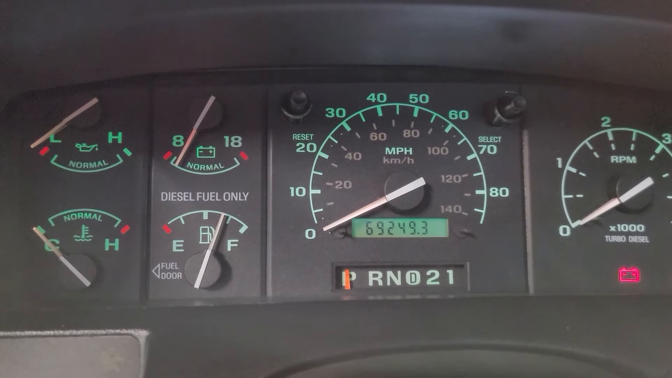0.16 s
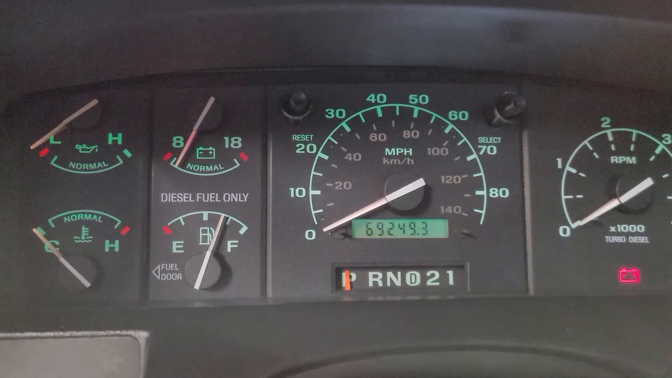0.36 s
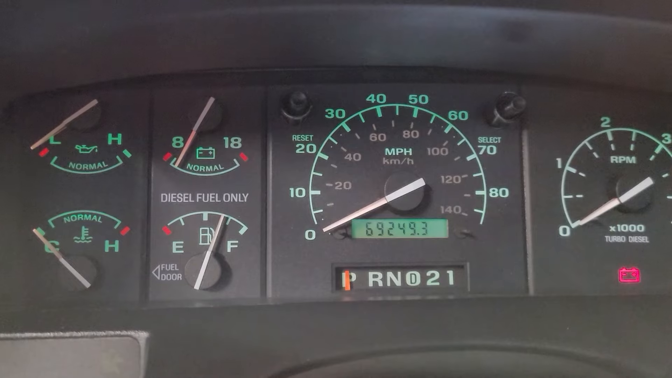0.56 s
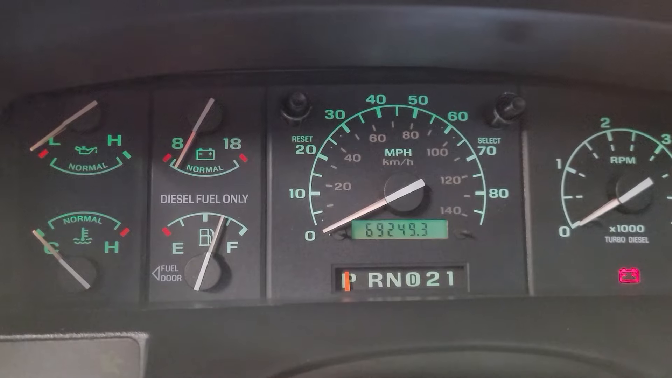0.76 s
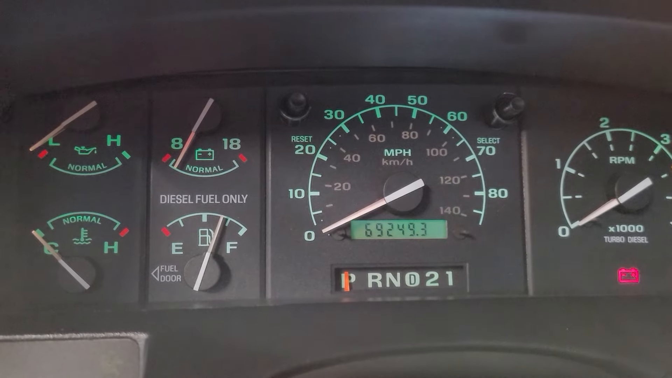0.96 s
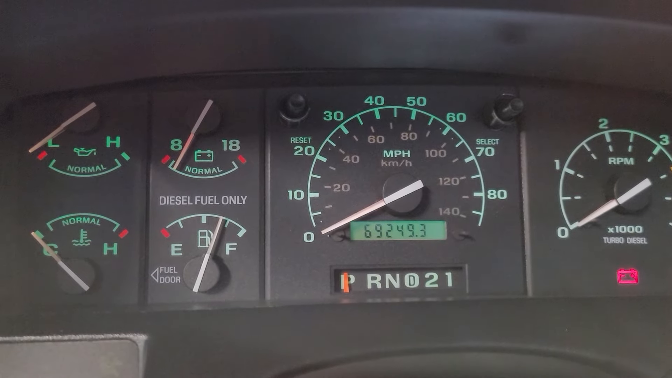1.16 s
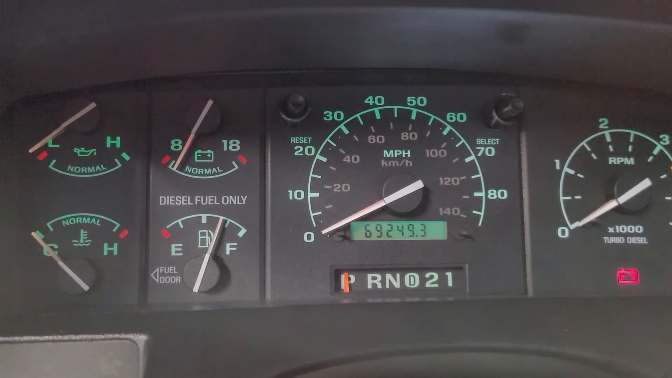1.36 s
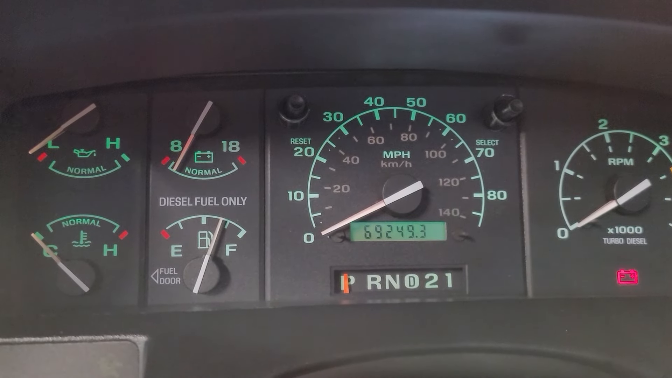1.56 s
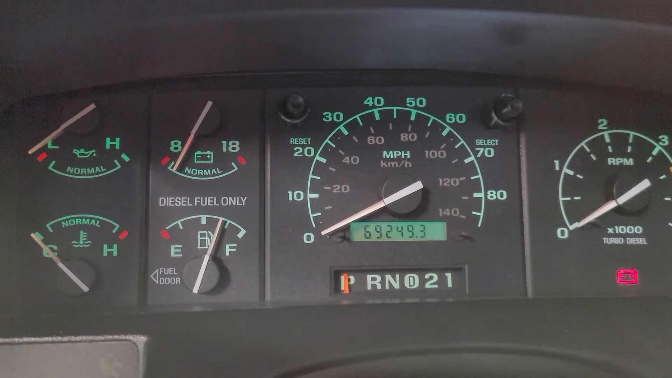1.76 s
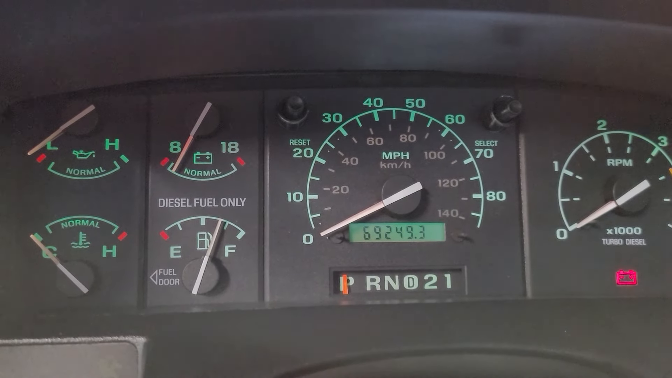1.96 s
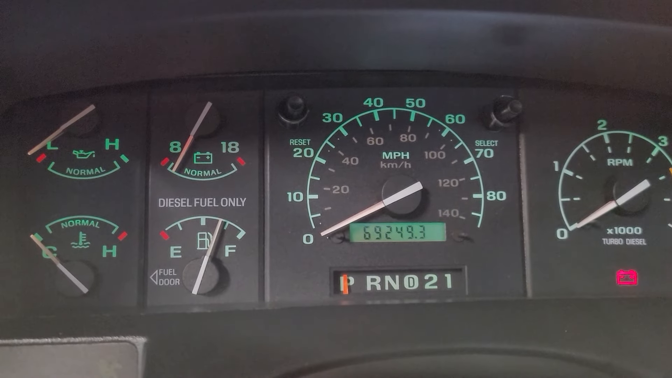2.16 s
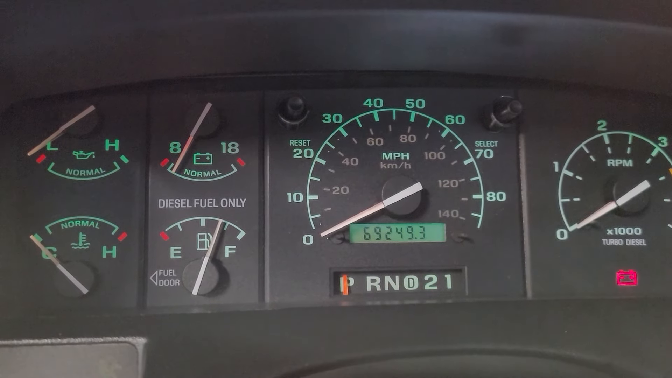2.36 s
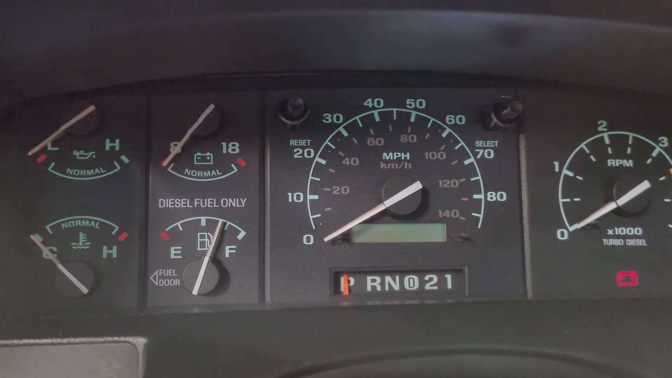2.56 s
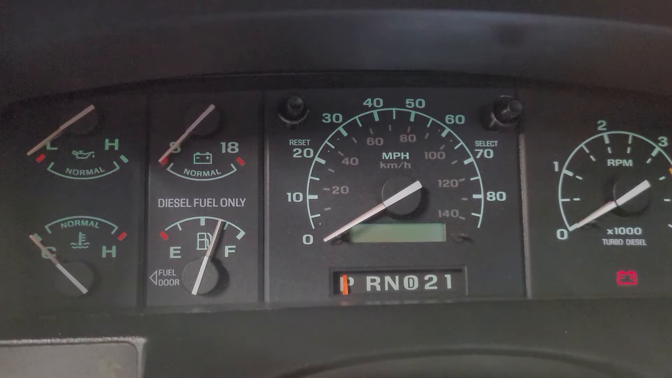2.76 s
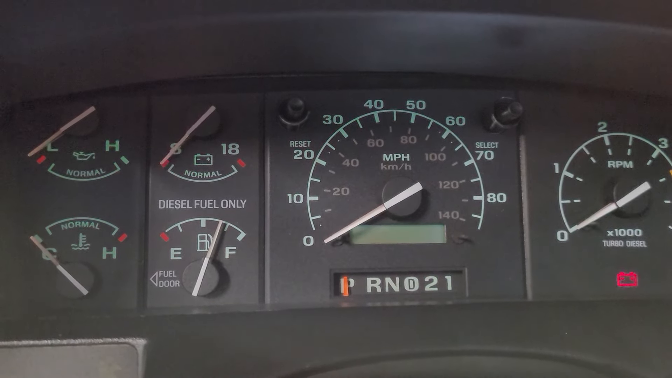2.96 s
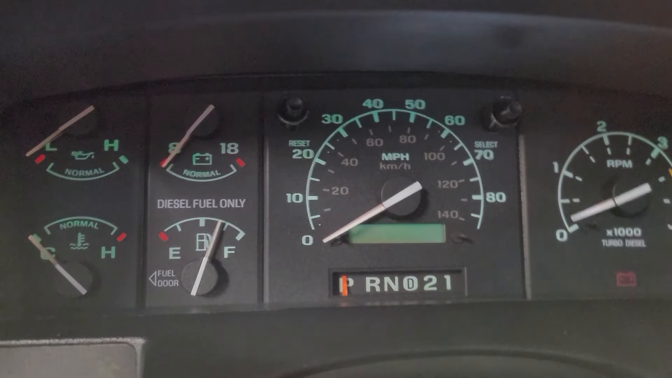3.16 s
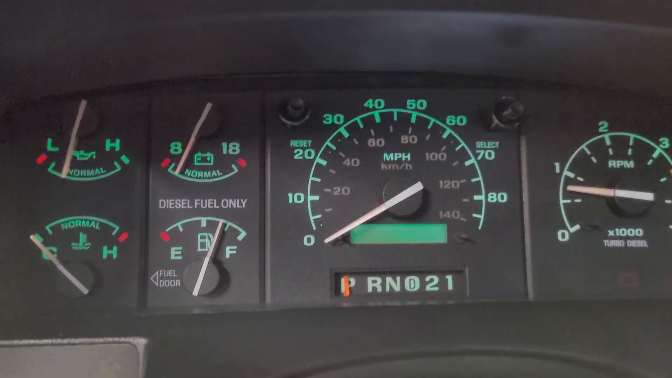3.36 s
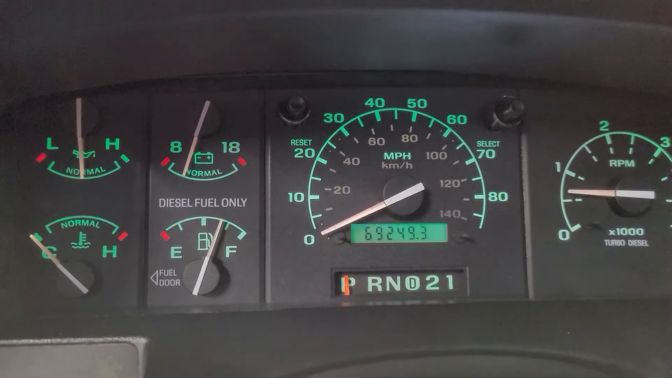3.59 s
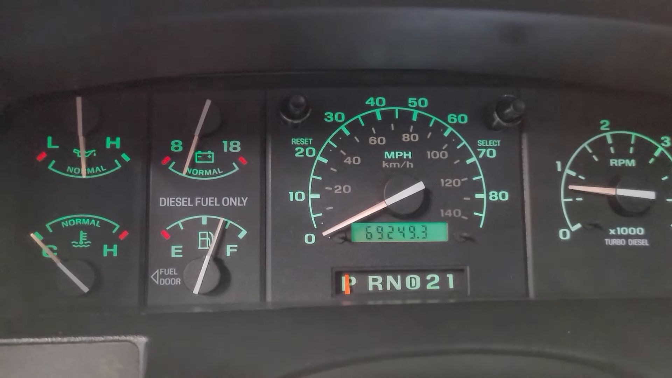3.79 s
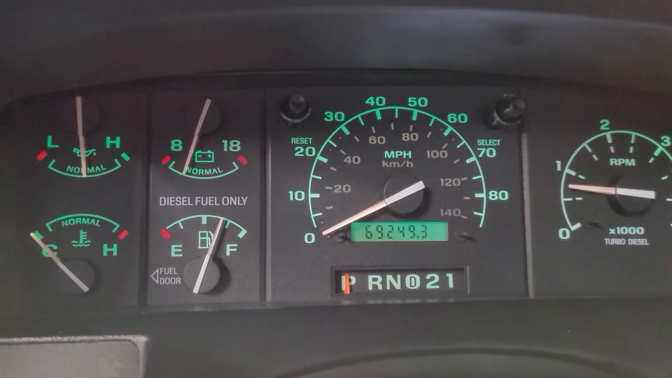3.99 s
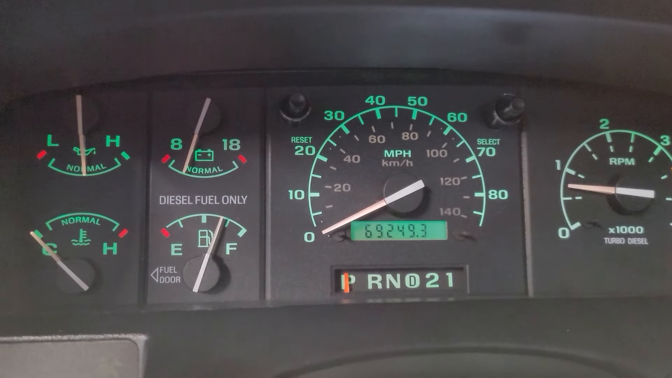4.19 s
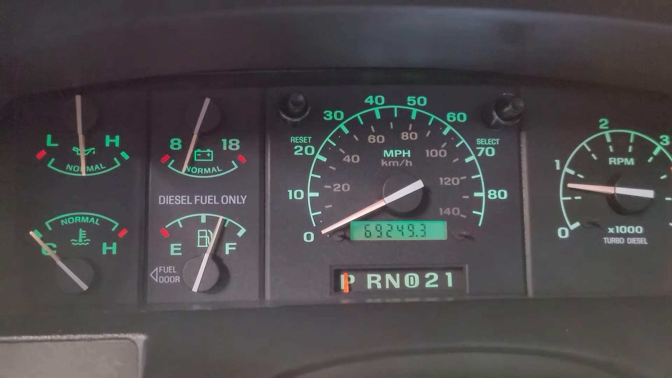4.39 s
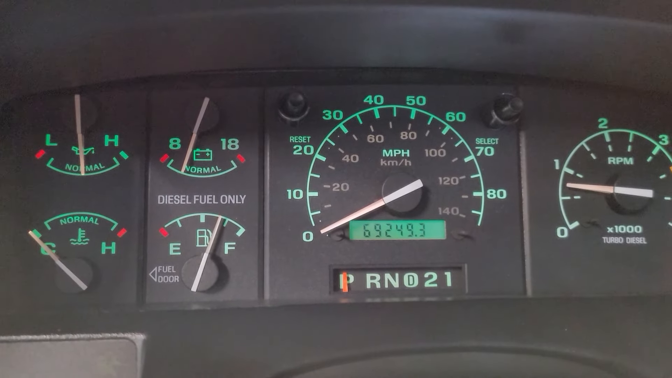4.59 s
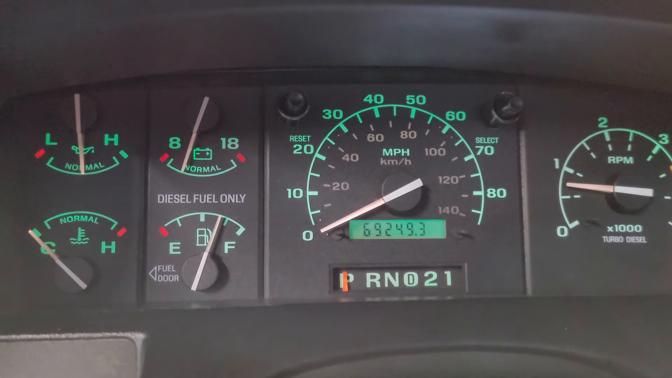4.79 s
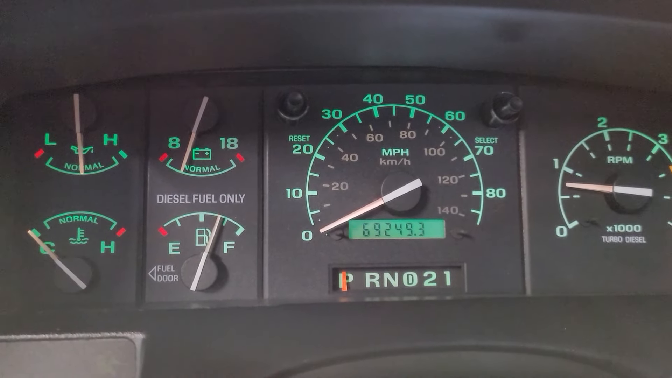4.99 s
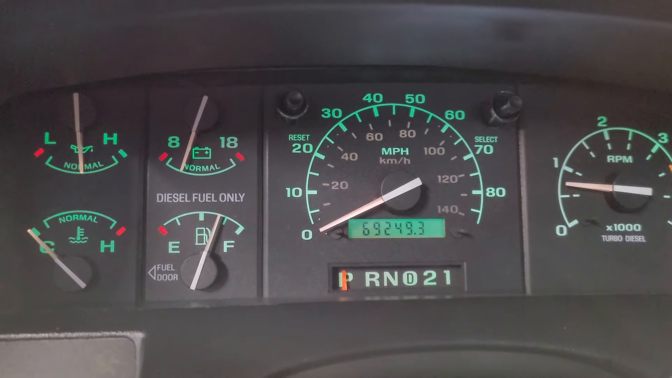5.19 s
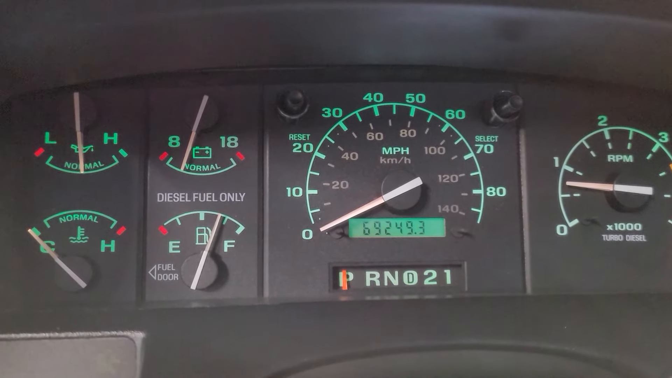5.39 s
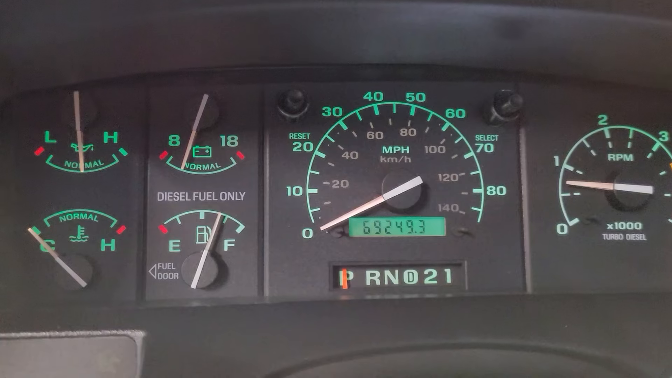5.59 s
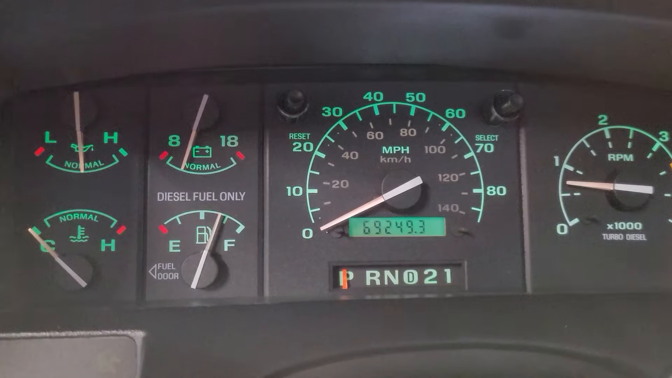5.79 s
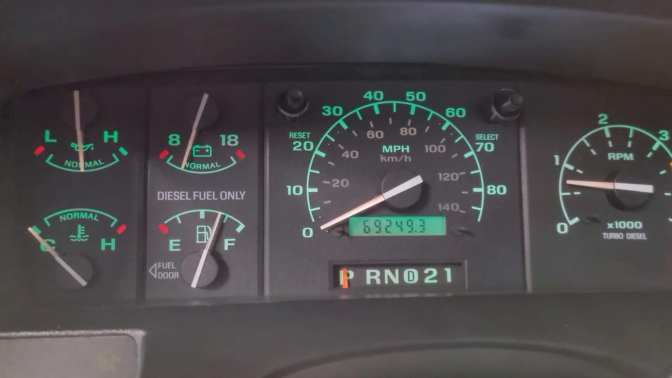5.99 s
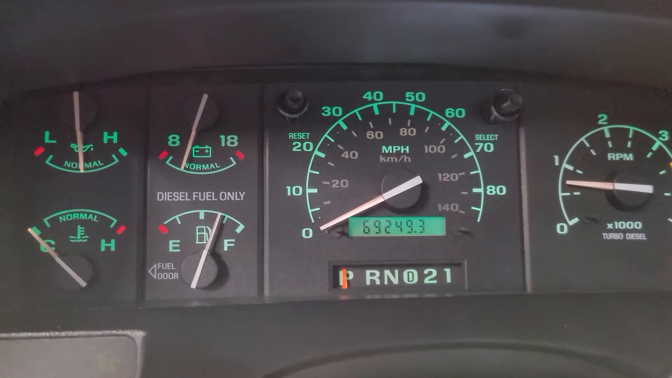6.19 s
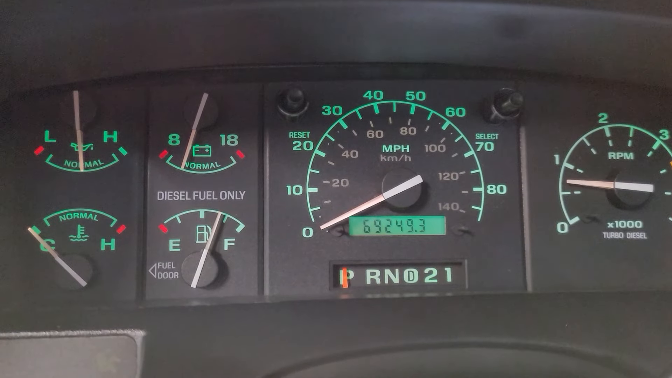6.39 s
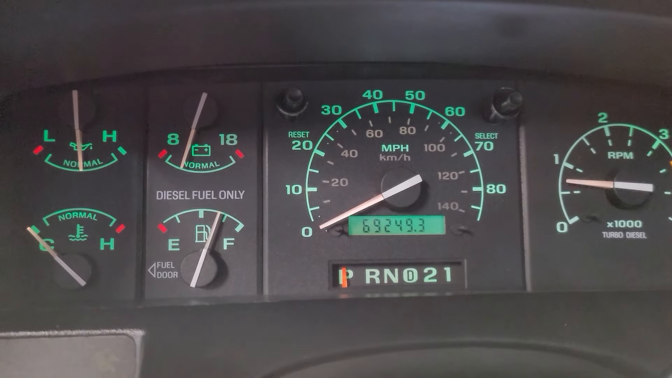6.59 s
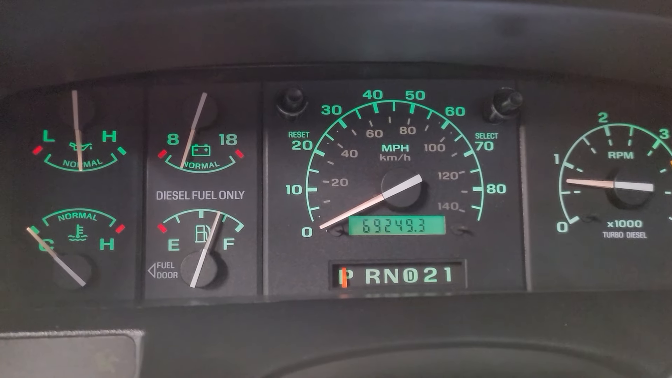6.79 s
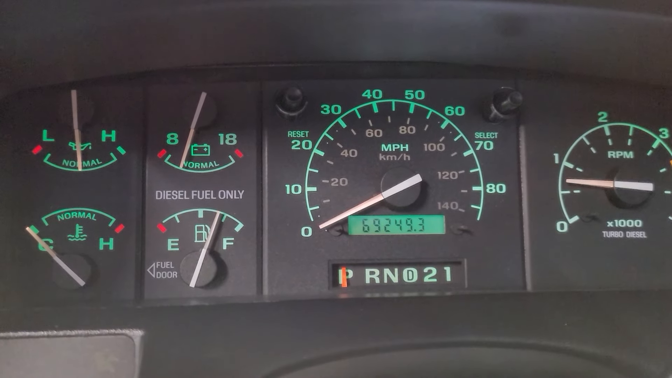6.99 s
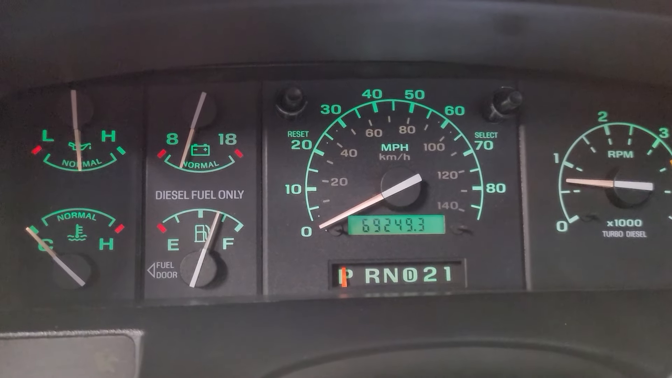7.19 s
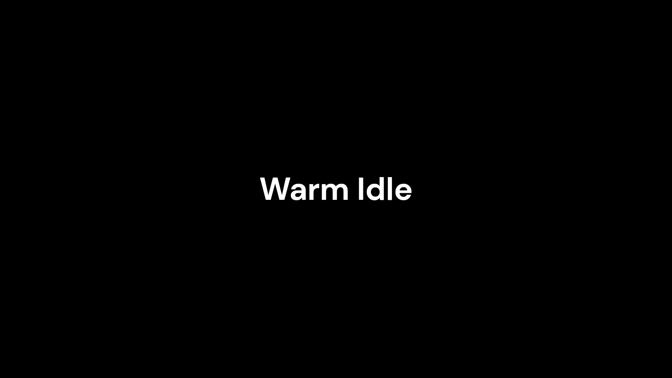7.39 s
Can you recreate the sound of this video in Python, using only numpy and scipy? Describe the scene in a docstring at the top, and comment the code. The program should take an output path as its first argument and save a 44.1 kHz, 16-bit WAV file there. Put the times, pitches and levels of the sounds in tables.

```python
"""A V8 turbo-diesel pickup starts up, heard in stereo from the driver's seat, inside the cab.
Close by, keys clink and the ignition switch snaps over. Beyond the firewall the starter grinds and
groans for half a second, then the engine catches with a shudder, flares and settles to a fast idle:
combustion rings the block, injectors clatter and exhaust pulses make the cab air boom.
The sound stops short just before the end."""
import sys
import numpy as np
from scipy import signal
from scipy.fft import rfft, irfft
from scipy.io import wavfile
from scipy.ndimage import uniform_filter1d

SR = 44100
rng = np.random.default_rng(int(sys.argv[2]) if len(sys.argv) > 2 else 0)


def store_wav(level_fs):
    """Save 16-bit WAV to argv[1]."""
    pcm = np.round(np.clip(np.atleast_2d(level_fs), -1, 1) * 32767)
    wavfile.write(sys.argv[1], SR, pcm.T.astype(np.int16))


N = 328545
TIME, HZ = np.arange(N) / SR, np.fft.rfftfreq(N, 1 / SR)
CRACK_SAMPLES = 16384
CRACK_HZ = np.fft.rfftfreq(CRACK_SAMPLES, 1 / SR)
FIRINGS_PER_CYCLE = 8
CRANK_S, FIRE_S, STOP_S = 2.458, 3.06, 7.328  # starter engages, first firing, sound cuts off
RUN_S, RUN_RISE_S = 3.27, 0.29  # steady running takes over
HUNT_S = 3.625  # the governor's largest correction

# how early each of nine engine parts is struck: (lead on the exhaust pulse [firings])
PART_LEADS = [.85, .8, .55, .25, .4, .85, .42, .55, .3]


def engine(firings):
    """Block knock and injector clatter come through the firewall, over a rumble of cab panels."""
    # clatter at the seat: (frequency [Hz], level [dB])
    clatter_colour = [(150, -33), (250, -6.5), (308, -10), (380, -5), (455, -10.5), (600, -7.5), (760, -12),
                      (1200, -16.5), (1550, -13), (1850, -23.5), (2450, -19.5), (4400, -29.5),
                      (5400, -40.5), (7000, -40), (9000, -59), (11500, -48.5), (16000, -52.5)]
    # panel rumble: (frequency [Hz], level [dB])
    rumble_colour = [(15, -23.5), (25, -11.5), (60, 4.5), (85, -9.5), (120, -4.5), (160, 2), (235, -8),
                     (275, -14.5), (330, -26), (600, -66)]
    # extra shake until the cold cylinders fire evenly
    cold = np.exp(-np.maximum(TIME - HUNT_S, 0) / 0.45) * ramp(HUNT_S - .12, 0.1)
    rumble_gain = gain_of(-31 + 1.5 * governor() + 5 * cold)
    knock_gain = gain_of(-41 + 3.5 * governor())
    stroke = firings + PART_LEADS[0]
    injectors = rattle(stroke, rough=0.52, decay=0.2, bed=2.7, uneven_db=-0.5)
    clatter = cab(injectors, colour(clatter_colour) * ripple(HZ, depth_db=2.0))
    # the clatter below 900 Hz swells once a cycle
    body = irfft(rfft(clatter) / (1 + (HZ / 900) ** 6), N)
    chug_db = 1.8 * np.cos(2 * np.pi * (stroke - 4.7) / FIRINGS_PER_CYCLE)
    clatter = clatter + body * (gain_of(chug_db) - 1)
    panels = cab(rattle(firings, rough=0.78, decay=0.23, bed=0.56, uneven_db=2), colour(rumble_colour))
    knock = gain_of(0.5) * clatter + gain_of(-4.0) * block(firings)
    return ramp(RUN_S, RUN_RISE_S) * (knock_gain * knock + rumble_gain * panels)


def block(firings):
    """Combustion knock rings the block; the uneven cylinders make its clack-clack rhythm."""
    # ringing engine parts: (frequency [Hz], width [Hz], level [dB], part [0-8])
    modes = [(399, 20, 3, 0), (428, 20, -5, 0), (502, 20, 4, 1), (528, 20, -6, 1), (626, 30, -2, 2),
             (665, 26, -5, 2), (974, 34, -4.5, 3), (1137, 24, 4, 4), (1222, 54, -1, 5), (1290, 56, 0, 6),
             (1585, 70, -9, 7), (1654, 36, -8, 7), (1972, 40, -15, 8), (2417, 70, -18.5, 8),
             (2698, 70, -20, 8), (3472, 90, -23, 8), (4137, 90, -26, 8), (4520, 90, -28, 8)]
    # one row a cylinder, in firing order: (strength into each of the nine parts [dB])
    cylinders = [(-5, -3, 0, -4, -7, -5, -7, -7, -5), (-10, -3, -7, -12, -10, -8, -11, -1, -6),
                 (-6, -8, -2, -8, -7, 0, 3.5, -5, -5), (-3, -5, -4, -4, -10, -8, -12, -2, -5),
                 (0, -1, -2, -1, -7, -9, -10, -2, -4), (-2, 0, -1, -4, -12, -8, -11, -1, 0),
                 (-7, -7, -5, -12, -13, -8, -13, -4, -5), (-2, -4, -10, 0, 0, 0, -3, -9, -1)]
    ring, to_seat_s = 0, 0.00497
    for part, (lead, cylinder_db) in enumerate(zip(PART_LEADS, np.transpose(cylinders))):
        # a second, wider resonance rounds the attack: the ring builds through mounts and firewall
        response = sum(gain_of(db) / ((1 + 2j * (HZ - hz) / width) * (1 + 1j * (HZ - hz) / (2 * width)))
                       for hz, width, db, owner in modes if round(owner) == part)
        ring = ring + response * rfft(blows(firings + lead, cylinder_db, uneven_db=1, jitter_s=.00015))
    return cab(irfft(ring * np.exp(-2j * np.pi * HZ * to_seat_s), N), 1)


def blows(stroke, cylinder_db, uneven_db, jitter_s, path_spread_s=.001):
    """One sharp blow a firing, each cylinder with its own strength and path, never quite on time."""
    at = np.flatnonzero(np.diff(stroke.astype(int))) + 1
    cylinder = stroke[at].astype(int) % len(cylinder_db)
    chance = rng.standard_normal((len(at), 2))
    force = gain_of(cylinder_db[cylinder] + uneven_db * chance[:, 0])
    path_s = path_spread_s * rng.uniform(-1, 1, (2, len(cylinder_db)))
    late_s = path_s[:, cylinder] + jitter_s * chance[:, 1]
    arrivals = np.clip(at + np.round(SR * late_s), 0, N - 1).astype(int)
    return np.array([np.bincount(side, force, N) for side in arrivals])


def rattle(firings, rough, decay, bed, uneven_db):
    """A burst a firing over a steady bed; each cylinder repeats its own noise, the rough share is new."""
    size = 7200
    place_in_cycle = (firings / FIRINGS_PER_CYCLE % 1 * size).astype(int)
    repeated = rng.standard_normal((2, size))[:, place_in_cycle]
    noise = np.sqrt(1 - rough) * repeated + np.sqrt(rough) * rng.standard_normal((2, N))
    force = gain_of(uneven_db * rng.standard_normal(N))[firings.astype(int)]
    return noise * (bed + force * np.exp(-(firings % 1) / decay))


def exhaust(firings, rate):
    """Firing pulses boom as their orders slide through cab resonances; unequal cylinders add a lope."""
    # cab air resonances: (driving order [x firing rate], frequency [Hz], width [Hz], level [dB])
    resonances = [(1, 49.5, 2.4, -23), (2, 91.3, 13.5, -31.5), (4, 187.8, 6.9, -32.5)]
    # tones of the lope: (order [x engine cycle rate], level [dB])
    lope_orders = [(3, -48.5), (10, -54.5), (11, -52.5), (14, -41), (31, -49.5), (38, -49.5)]
    lag_s = np.array([[0], [0.00032]])  # the boom reaches the right side later
    boom, lope, cycles = 0, 0, firings / FIRINGS_PER_CYCLE
    for order, hz, width, db in resonances:
        order = round(order)
        level = gain_of(db) / np.hypot(1, 2 * (order * rate - hz) / width)
        if order == 1:
            level *= gain_of(-7.5 * np.maximum(governor(), -.3)) * (1 + 0.16 * drift(5))
            # the boom is hardest as the speed tops out
            level += gain_of(-14.5) * swell(3.303, rise_db_per_s=102, fall_db_per_s=87.5)
        else:
            level *= 1 + 0.3 * drift(7)
        boom += level * np.sin(2 * np.pi * order * (firings - rate * lag_s + 0.0049 * drift(10)))
    for order, db in lope_orders:
        level = gain_of(db) * (1 + 0.15 * drift(2.6))
        lope += level * np.cos(2 * np.pi * (round(order) * cycles + rng.random()))
    return np.sqrt(2) * (ramp(FIRE_S, .02) * boom + ramp(RUN_S, RUN_RISE_S) * lope)


def governor(period_s=.24, decay_s=0.27):
    """The fuel hunts after the flare in shrinking swings: more fuel means more knock and less boom."""
    since = TIME - HUNT_S
    onset = ramp(HUNT_S - period_s / 2, period_s / 2)
    return onset * np.cos(2 * np.pi * since / period_s) * np.exp(-np.maximum(since, 0) / decay_s)


def catch(firings):
    """The first cold firings hammer and shake the cab; starting fuel builds, then is cut back."""
    # the shaken cab: (frequency [Hz], level [dB])
    surge_colour = [(7.1, -44.5), (16, -3), (48, -1.5), (165, -11), (310, -25), (502, -25), (566, -29),
                    (638, -22.5), (788, -33.5), (1170, -28.5), (1280, -31.5), (2130, -36), (9590, -62),
                    (16000, -68)]
    cold_lag = .35  # cold fuel lights late by this share of a firing
    fuel = ramp(FIRE_S, 0.004) * swell(3.255, rise_db_per_s=32, fall_db_per_s=58)
    hammer = rattle(firings - cold_lag, rough=0.85, decay=.35, bed=.65, uneven_db=1)
    return gain_of(-16) * fuel * cab(hammer, colour(surge_colour) * ripple(HZ, depth_db=2.0))


def starter(firings, thud_rise_s=0.02, rock_hz=43):
    """Gears grind, pistons thud, the cab rocks on its mounts and the motor groans under load."""
    # compressions and first hard firings: (time [s], cab rocking [dB], thud [dB])
    compressions = [(2.462, -60, -41), (2.49, -55, -27.5), (2.522, -35, -37.5), (2.556, -27, -30.5),
                    (2.61, -34, -33), (2.715, -31, -42), (2.788, -33, -43), (2.87, -38, -43.5),
                    (2.931, -30.5, -35), (3.01, -34, -35.5), (3.145, -26, -31), (3.217, -21.5, -24.5)]
    # piston thuds: (frequency [Hz], level [dB])
    thud_colour = [(15, -31.5), (35, -4.5), (60, -0.5), (130, -1), (220, -3.5), (330, -21.5), (700, -59)]
    # grinding gears: (frequency [Hz], level [dB])
    grind_colour = [(190, -22), (330, -1), (442, -16.5), (487, -10.5), (592, -9), (760, -10.5), (850, -20),
                    (964, -11.5), (1520, -16.5), (1820, -17), (4360, -28), (9520, -51.5), (16000, -53)]
    # motor groans: (time [s], length [s], start pitch [Hz], pitch lost [share], level [dB])
    groans = [(2.462, 0.076, 491, -0.11, -43), (2.483, 0.041, 300, .29, -35),
              (2.54, 0.086, 229.3, 0.038, -35), (2.558, 0.054, 527, .03, -41),
              (2.597, 0.084, 557, -.15, -45.5), (2.669, 0.054, 587, -.02, -44),
              (2.675, 0.1295, 299.6, 0.33, -28.5), (2.69, .11, 526, .06, -46.5),
              (2.726, 0.057, 612, .04, -43.5), (2.783, 0.087, 368.7, 0.074, -38),
              (2.835, 0.093, 305, .27, -35), (2.838, 0.096, 513.6, 0.048, -46.5),
              (2.925, 0.052, 215, 0.45, -34.5), (2.965, 0.088, 503, -.04, -46),
              (2.971, .05, 590, -.03, -48)]
    thud, rock = 0, 0
    for s, rock_db, thud_db in compressions:
        age = np.maximum(TIME - s, 0) / thud_rise_s
        push = age * np.exp(1 - age)
        thud += gain_of(thud_db) * push
        rock += gain_of(rock_db) * push ** 2 * np.sqrt(2) * np.sin(2 * np.pi * rock_hz * (TIME - s))
    engaged = ramp(CRANK_S, 0.016) * (1 - ramp(FIRE_S - .04, 0.11))
    # the grind swells as the starter speeds up past each cylinder, and eases as the engine turns over
    chug_db = 2 * np.cos(2 * np.pi * (TIME - 2.823) / 0.147)
    grind = engaged * gain_of(-44.5 + chug_db - 1.5 * (TIME - CRANK_S) + 1.8 * drift(40))
    grind += gain_of(-29.5) * thud  # each compression loads the gears
    out = rock + thud * cab(rng.standard_normal((2, N)), colour(thud_colour))
    gears = rattle(9 * firings, rough=0.97, decay=0.76, bed=1.0, uneven_db=3.5)
    out += grind * cab(gears, colour(grind_colour) * ripple(HZ, depth_db=4.0))
    for s, *shape in groans:
        add(out, s, groan(*shape))
    return out


def groan(length, start_hz, sag, db):
    """The starter's tone glides with its load; gear teeth roughen its pitch and level."""
    progress = np.linspace(0, 1, int(length * SR))
    shake = unit_rms(uniform_filter1d(rng.standard_normal(len(progress)), size=200))
    wobble = unit_rms(uniform_filter1d(rng.standard_normal(len(progress)), size=200))
    glide = 1 - sag * np.tanh(4.48 * progress * (1 + progress) / 2)
    phase = 2 * np.pi * np.cumsum(start_hz * glide * (1 + .008 * wobble)) / SR
    tone = np.sin(phase) + gain_of(-18) * sum(np.sin(k * phase) / k for k in range(2, 6))
    return gain_of(db) * np.sqrt(2) * np.sin(np.pi * progress ** .8) * (1 + .2 * shake) * tone


def keys(bounces_per_s=700, bounce_decay_s=.028, spread_rad=1.38):
    """Hanging keys crack together and ring, bouncing on each other, until a neighbour damps them."""
    # overtones of the keys: (frequency [Hz], level [dB], t60 [s], family [0-3])
    overtones = [(2080, -27.5, .3, 0), (3145, -4, .13, 0), (3278, -13, .09, 0), (3984, -11, .07, 0),
                 (4300, -6, .066, 0), (8070, -13, .4, 0), (5051, 0, .15, 1), (7065, -32, .15, 1),
                 (8930, -26, .1, 1), (8979, -22, .08, 2), (11470, -8, .24, 2), (11550, -9, .18, 2),
                 (11390, -14, .12, 2), (12208, -22, .25, 2), (12650, -26, .17, 2), (15075, -12, .06, 3),
                 (15230, -5, .07, 3), (15293, 1.5, .097, 3), (15350, -6, .065, 3)]
    # key on key: (time [s], contact [dB], ring of each family [dB], bunch shimmer [dB],
    # time until damped [s], left minus right [dB])
    clinks = [(0.9737, -30.5, (-30, -26, -32.5, -35), -38, .13, -3.5),
              (1.118, -47.5, (-53.5, -37.5, -61.5, -55.5), -49, .011, -8.5),
              (1.1983, -42, (-42, -16, -34.5, -28), -33.5, 0.035, -8),
              (1.2167, -42.5, (-45, -38, -35.5, -42.5), -43.5, .012, -4.5),
              (1.2367, -37.5, (-41, -24, -46, -41.5), -42, 0.0061, -5),
              (1.2495, -42.5, (-46.5, -20.5, -43, -41), -43, 0.0019, -8), (1.371, -60, (-60, -54, -80, -67),
              -68, 0.006, -0.5), (2.329, -52, (-56, -51, -62, -62), -63, .04, -5),
              (2.388, -65, (-65, -41, -73, -63), -59, 0.0034, -13), (3.484, -58, (-58, -62, -59, -63),
              -59, .063, 3), (3.577, -36, (-42, -29, -16, -31), -22.5, .02, -1.5),
              (3.601, -52, (-54, -40, -33, -44), -45, 0.033, 3), (3.758, -40.5, (-34.5, -19, -25.5, -21.5),
              -26.5, .075, -1), (3.806, -60, (-51, -41, -35, -48), -41, 0.053, -1),
              (3.911, -50, (-54, -43.5, -55, -52), -50, 0.03, 0)]
    out, t = np.zeros((2, N)), np.arange(SR // 4) / SR
    for s, contact_db, family_db, bunch_db, free_s, pan_db in clinks:
        pitches = np.linspace(2800, 16000, 110) + rng.uniform(-100, 100, 110)
        add(out, s, crack(contact_db, snap_colour(tilt_db=6.5), t60=.045, tail_db=-23))
        # a trace of the ring outlasts the damping
        envelope = (0.019 + np.exp(-(t / free_s) ** 4)) * (1 - np.exp(-t / 0.0013))
        bounces = .24 * np.exp(-t / bounce_decay_s) * (rng.random(len(t)) < bounces_per_s / SR)
        for hz, db, t60, family in overtones:
            # bounces mostly stir the high overtones
            kicks = (t == 0) + bounces * (hz / 12500) ** 2 * np.exp(2j * np.pi * rng.random(len(t)))
            amplitude = signal.lfilter([1], [1, -gain_of(-60 / (t60 * SR))], kicks)
            swing = amplitude * np.exp(2j * np.pi * hz * t)
            phase = rng.uniform(0, 2 * np.pi) + spread_rad * rng.choice([-1, 1]) * np.arange(2)[:, None]
            ring = gain_of(family_db[round(family)] + db) * (swing * np.exp(1j * phase)).real
            lean_db = pan_db - 7 * (hz > 14000)  # the highest ring beams to the right
            add(out, s, envelope * ring * gain_of([[lean_db / 2], [-lean_db / 2]]))
        brief = len(t) // 2
        shimmer = envelope[:brief] * bunch(t[:brief], pitches)
        add(out, s, shimmer * gain_of([[bunch_db + pan_db / 2], [bunch_db - pan_db / 2]]))
    return out


def bunch(t, pitches):
    """The other keys and their ring shimmer: many brief overtones, struck differently each time."""
    # the shimmer: (frequency [Hz], level [dB])
    bunch_colour = [(2800, -18), (4900, -6), (6000, -21), (7100, -8.5), (7800, -18.5), (9000, -10.5),
                    (10000, -19), (11500, -2), (13000, -8), (15000, 2), (16000, -6)]
    phase = rng.uniform(0, 2 * np.pi, (2, len(pitches), 1))
    strength = gain_of(curve_at(bunch_colour, pitches) + 3 * rng.standard_normal(len(pitches)))[:, None]
    t60 = 0.082 * np.exp(.25 * rng.standard_normal((len(pitches), 1)))
    envelopes = strength / np.linalg.norm(strength) * gain_of(-60 * t / t60)
    return (envelopes * np.sin(2 * np.pi * pitches[:, None] * t + phase)).sum(1)


def snaps(ring_half_width=0.056):
    """Lock, switch and starter pinion snap, and the first hard firings knock, each with its own ring."""
    # (time [s], level [dB], tilt [dB/octave], t60 [s], ring pitch [Hz], ring level [dB])
    hits = [(.449, -44.5, -2.5, 0.079, 1400, 0), (.46, -42.5, -50, 0.15, 90, -4),
            (.975, -50, -3.5, 0.075, 1600, -7), (1.217, -51.5, -7, 0.21, 700, 2),
            (1.245, -54, -11.5, 0.072, 447, -2), (2.345, -37, 3.5, 0.073, 4200, -5),
            (2.366, -46.5, -3, 0.17, 2030, 3), (2.457, -35, -11.5, 0.28, 400, 1),
            (2.468, -35.5, -8.5, 0.082, 1970, 15), (2.524, -38, -11, .06, 600, 11),
            (2.553, -39.5, 1, 0.054, 3600, -1), (3.055, -25, -1, 0.023, 2050, -7),
            (3.113, -22, -4.5, 0.031, 2400, 5), (3.184, -31.5, -11, 0.14, 560, 8),
            (3.218, -27, -9.5, 0.12, 2400, 5.5), (3.244, -26.5, -9.5, 0.083, 1000, 3.5),
            (3.315, -35.5, 1, 0.12, 2100, 3.5), (3.326, -38, 3.5, 0.066, 7000, 0),
            (3.482, -29, -2, 0.025, 4200, 6)]
    out = np.zeros((2, N))
    for s, db, tilt_db, t60, ring_hz, ring_db in hits:
        ring = 1 + gain_of(ring_db) / (1 + ((CRACK_HZ / ring_hz - 1) / ring_half_width) ** 2)
        add(out, s, crack(db, snap_colour(tilt_db) * ring, t60, tail_db=-14.5))
    return out


def crack(db, response, t60, tail_db):
    """A short crack, then the dense ring of the steering column and dashboard."""
    t = np.arange(CRACK_SAMPLES) / SR
    spectrum = rfft(rng.standard_normal((2, CRACK_SAMPLES)))
    ring = unit_rms(irfft(spectrum * response * ripple(CRACK_HZ, depth_db=4.0)))
    fall = np.exp(-t / 0.00068) + 0.94 * gain_of(-60 * t / t60) + gain_of(tail_db - 60 * t / 0.26)
    return gain_of(db) * ring * fall * (1 - np.exp(-t / 0.00076))


def snap_colour(tilt_db):
    """The spectrum of a snap, tilted by tilt_db an octave above about 700 Hz."""
    # a snap before tilting: (frequency [Hz], level [dB])
    untilted = [(22, -43), (90, -1), (300, 1), (900, 1), (2000, 2.5), (4500, -1), (7000, -5.5),
                (10000, -18.5), (12000, -13), (15500, -16)]
    return gain_of(curve_at(untilted, CRACK_HZ) + tilt_db * np.log2(1 + CRACK_HZ / 700))


def fingers():
    """Fingers rustle as they slide over the keys, within arm's reach of the microphone."""
    # slides: (time [s], length [s], level [dB], treble cutoff [Hz])
    rustles = [(0, 0.088, -70.5, 1200), (.34, 0.19, -77, 7000), (0.49, 0.45, -73, 12000),
               (0.937, 0.31, -70, 7000), (2.102, 0.77, -71, 3700)]
    # skin on keys: (frequency [Hz], level [dB])
    rustle_colour = [(300, -15.5), (1200, -5.5), (4100, -6.5), (6550, -6), (9700, -24), (16000, -15)]
    out = np.zeros((2, N))
    for s, length, db, top_hz in rustles:
        touch = gain_of(db + 2.5 * drift(59.8)) * np.sin(np.pi * ramp(s, length))
        out += touch * cab(rng.standard_normal((2, N)), colour(rustle_colour) / (1 + (HZ / top_hz) ** 6))
    return out


def quiet_cab():
    """Room tone of the cab: a low murmur from outdoors and faint electrical tones."""
    # outdoor murmur: (frequency [Hz], level [dB])
    murmur_colour = [(12, -54.5), (20, -14), (86, -11), (172, -18), (210, -9), (270, -26), (337, -29),
                     (500, -30.5), (850, -45.5), (1000, -41), (1860, -52), (2390, -47), (16000, -61.5)]
    # dashboard electrics: (frequency [Hz], level [dB])
    tones = [(215.3, -77), (982, -87), (1965, -90.5), (2945, -95.5), (3924, -96.5)]
    hum = 0
    for hz, db in tones:
        level = gain_of(db + 2 * drift(6.7)) * np.sqrt(2)
        hum += level * np.sin(2 * np.pi * (hz * TIME + 0.11 * drift(17)))
    return hum + gain_of(-60.5) * cab(rng.standard_normal((2, N)), colour(murmur_colour))


def cab(pair, response):
    """Colours and blends two signals as the cab does, at unit level: bass alike, treble diffuse."""
    # sound field at the seat: (frequency [Hz], left-right correlation [-1 to 1])
    likeness = [(60, 0.96), (130, 1), (215, 0.92), (300, 0), (400, 0.7), (520, 0.88), (620, 0.38),
                (760, 0.082), (970, 0.51), (1130, -0.52), (1300, -0.59), (1550, -0.43), (2000, 0.17),
                (3100, -0.047), (6820, 0.01), (15000, -0.43)]
    # balance at the seat: (frequency [Hz], left minus right [dB])
    balance = [(60, 1), (110, 1.5), (200, 2), (260, 4.5), (480, -0.5), (660, 4.5), (800, 1), (1290, 4.5),
               (2380, 2), (4400, 0), (8120, 3), (15000, -6)]
    common, separate = rfft(pair) * response
    same = np.clip(curve_at(likeness, HZ), -1, 1)
    lean = gain_of(curve_at(balance, HZ) / 2)
    right = same * common + np.sqrt(1 - same ** 2) * separate
    out = irfft(np.array([common * lean, right / lean]), N)
    return out / out.mean(0).std()


def ripple(hz, depth_db):
    """The close peaks and dips of a small cabin's response, above the bass."""
    knots = np.arange(0, SR / 2, 32)
    peaks = np.interp(hz, knots, rng.standard_normal(len(knots)))
    return gain_of(depth_db * peaks * np.clip(hz / 700 - .4, 0, 1))


def gain_of(db):
    return 10 ** (np.asarray(db) / 20)


def unit_rms(x):
    return x / np.sqrt(np.mean(x ** 2) + 1e-20)


def curve_at(points, hz):
    """Interpolates (frequency [Hz], value) points on a log frequency axis."""
    knots, values = np.transpose(points)
    return np.interp(np.log(hz + 1), np.log(knots + 1), values)


def colour(points):
    """Gain at every frequency from (frequency [Hz], level [dB]) points."""
    return gain_of(curve_at(points, HZ))


def add(mix, start_s, sound):
    part = mix[:, round(start_s * SR):][:, :sound.shape[-1]]
    part += sound[..., :part.shape[-1]]


def drift(per_s):
    """A random wander of about size 1."""
    knots = np.arange(0, N / SR + 1, 1 / per_s)
    return np.interp(TIME, knots, rng.standard_normal(N)[:len(knots)])


def ramp(start_s, rise_s):
    """Opens from 0 to 1."""
    return np.clip((TIME - start_s) / rise_s, 0, 1)


def swell(peak_s, rise_db_per_s, fall_db_per_s):
    """A gain that climbs to 1 and falls away."""
    return gain_of(-np.maximum(rise_db_per_s * (peak_s - TIME), fall_db_per_s * (TIME - peak_s)))


def scene():
    """One engine speed drives the truck's layers; keys and cab sound around the driver's seat."""
    # cranking, flare, then a fast idle that eases down: (time [s], rate [firings/s])
    speed = [(2.45, 6.24), (3.0, 12), (3.16, 30), (3.3, 56), (3.48, 58.2), (3.7, 49), (4.2, 49.56),
             (5.9, 47.72), (7.0, 47.27), (7.33, 46.15)]
    rate = np.interp(TIME, *np.transpose(speed))
    firings = np.cumsum(rate) / SR
    truck = starter(firings) + catch(firings) + engine(firings) + exhaust(firings, rate)
    cutoff = np.clip((STOP_S - TIME) / 0.0096 + 1, .001, 1)
    return (truck + keys() + fingers() + snaps() + quiet_cab()) * cutoff


def record(dry):
    """The recorder passes nothing much above 16.1 kHz."""
    lowpass = signal.firwin(255, 16100, window=("kaiser", 9), fs=SR)
    return signal.oaconvolve(dry, lowpass[None], "same")


dry = scene()
out = record(dry)
store_wav(out)
```